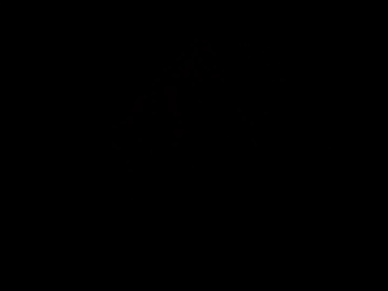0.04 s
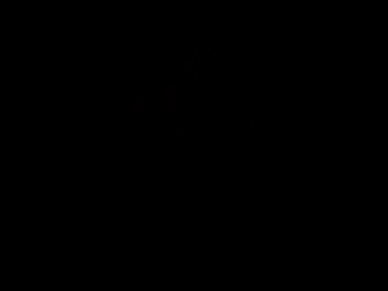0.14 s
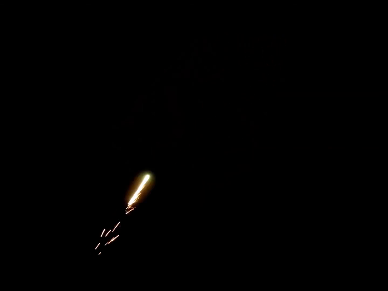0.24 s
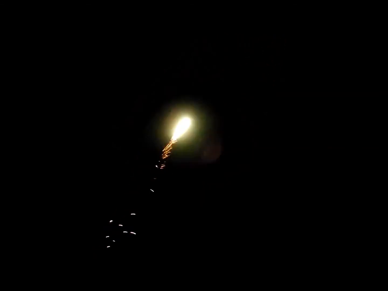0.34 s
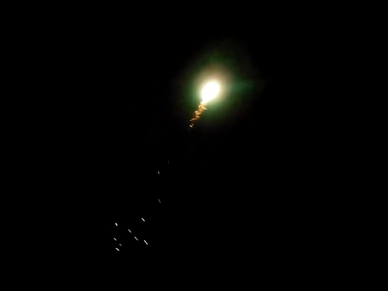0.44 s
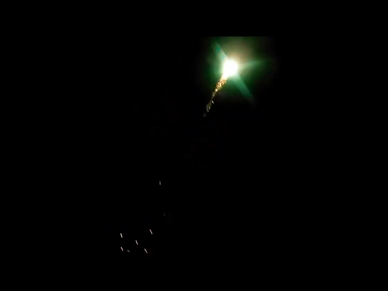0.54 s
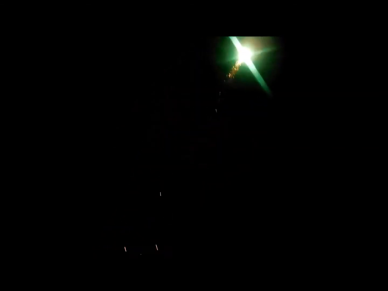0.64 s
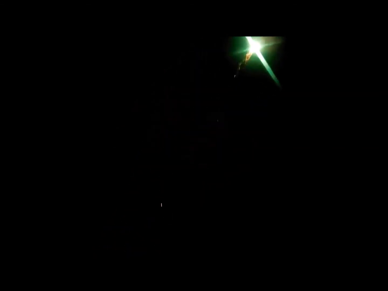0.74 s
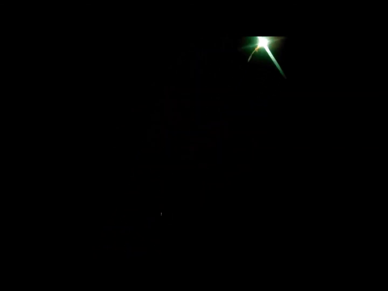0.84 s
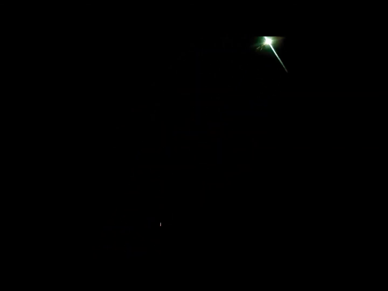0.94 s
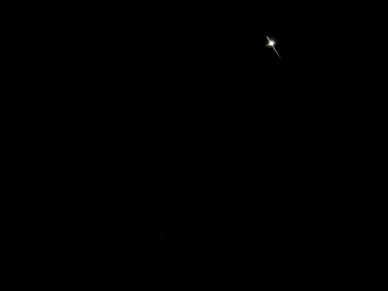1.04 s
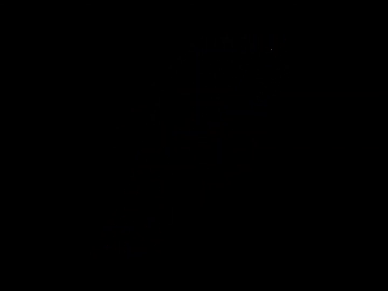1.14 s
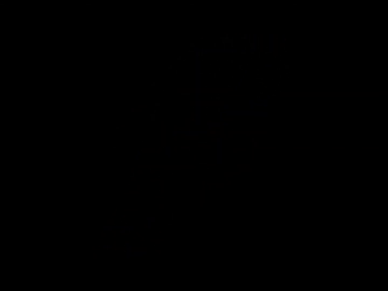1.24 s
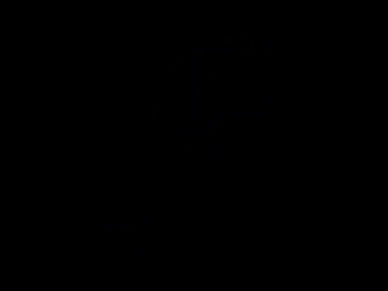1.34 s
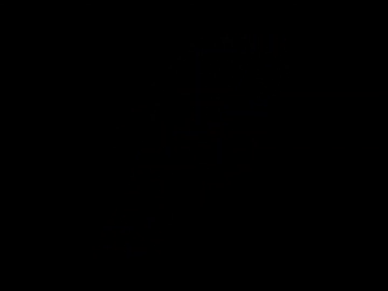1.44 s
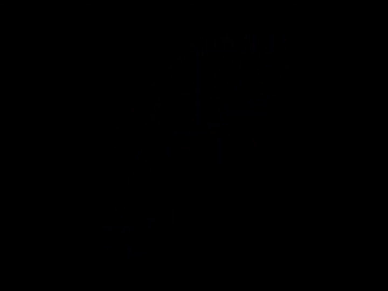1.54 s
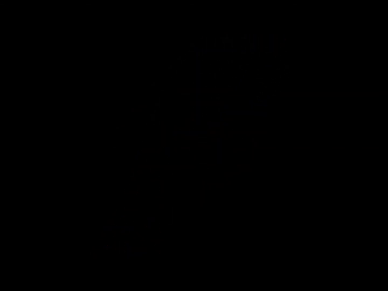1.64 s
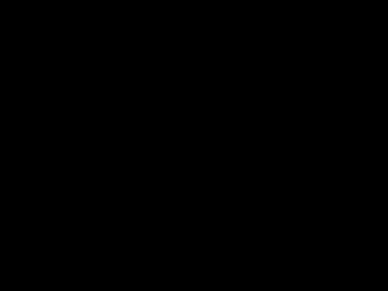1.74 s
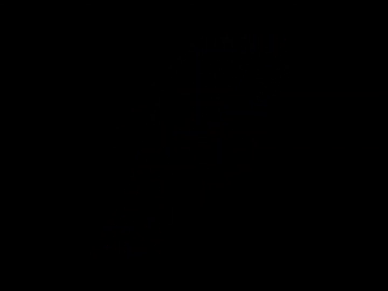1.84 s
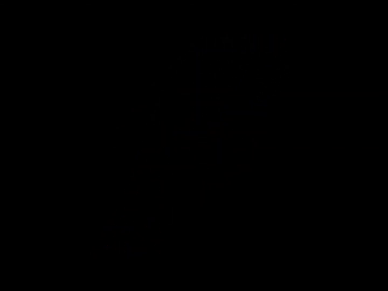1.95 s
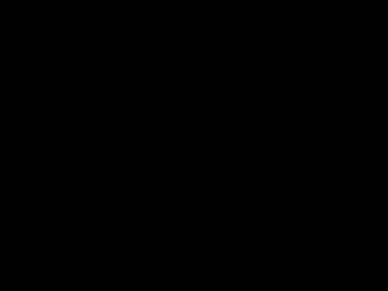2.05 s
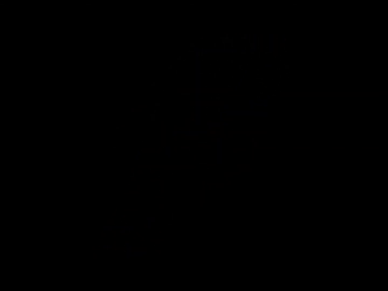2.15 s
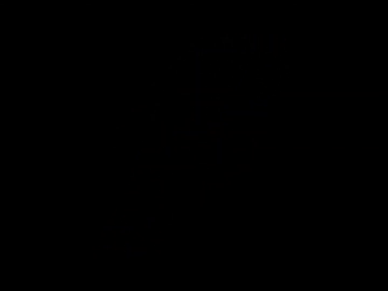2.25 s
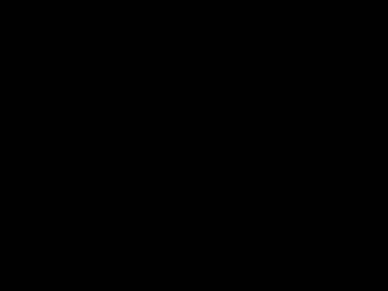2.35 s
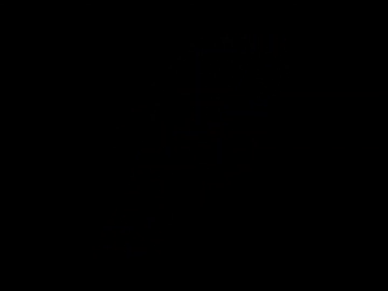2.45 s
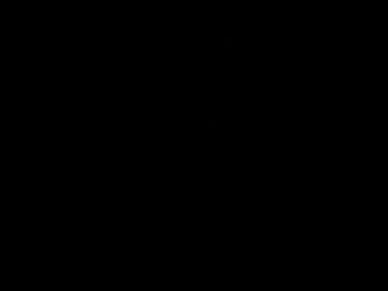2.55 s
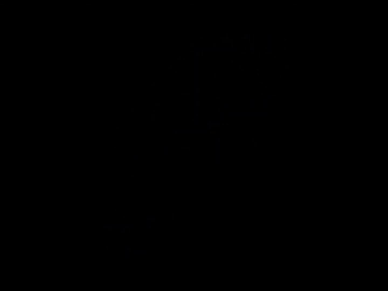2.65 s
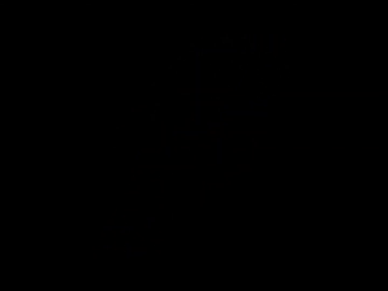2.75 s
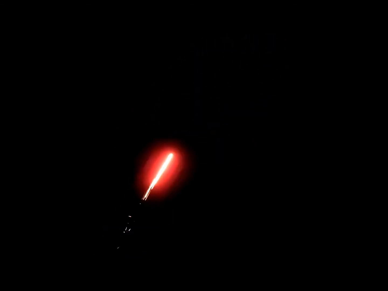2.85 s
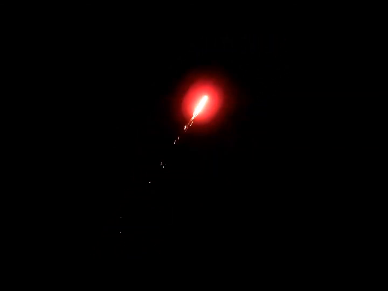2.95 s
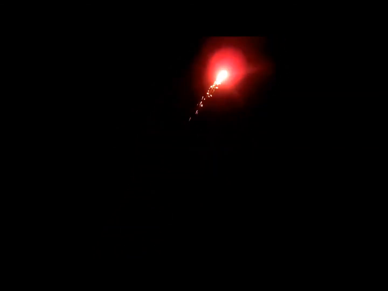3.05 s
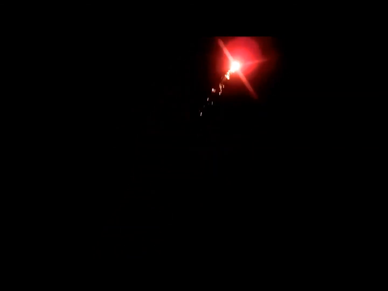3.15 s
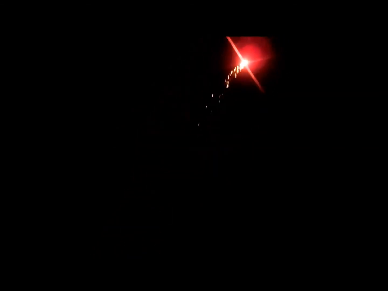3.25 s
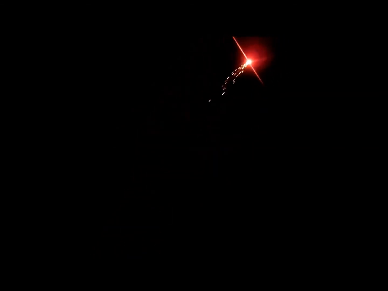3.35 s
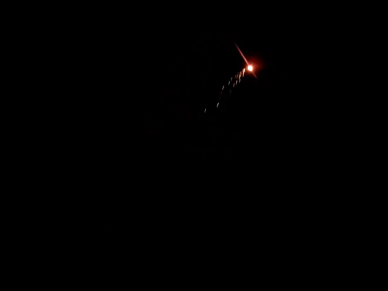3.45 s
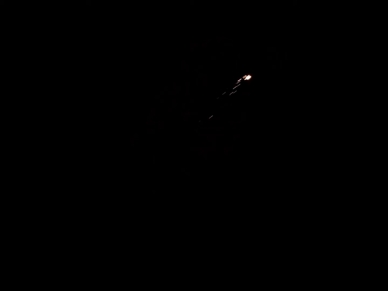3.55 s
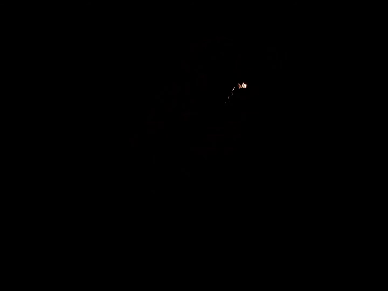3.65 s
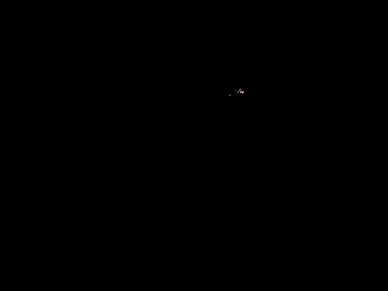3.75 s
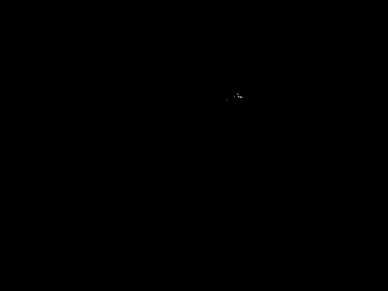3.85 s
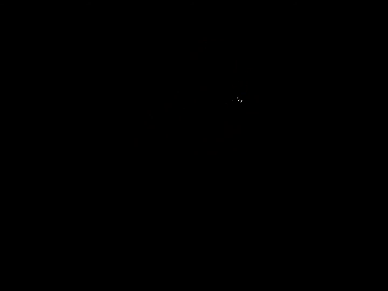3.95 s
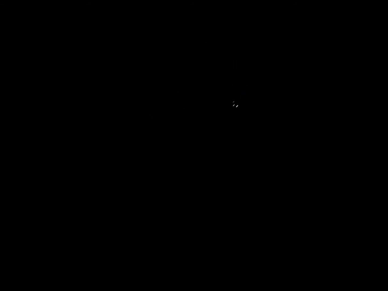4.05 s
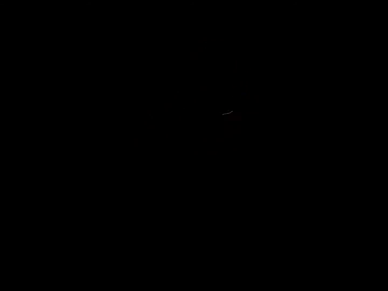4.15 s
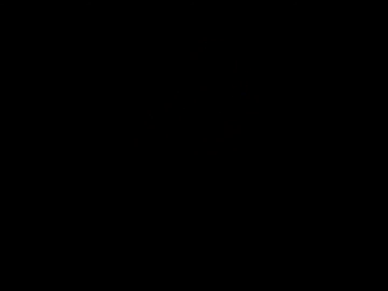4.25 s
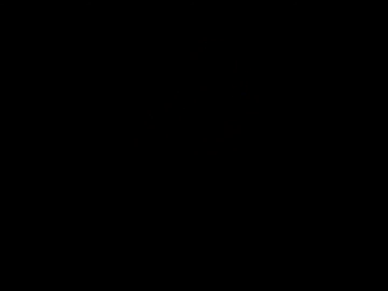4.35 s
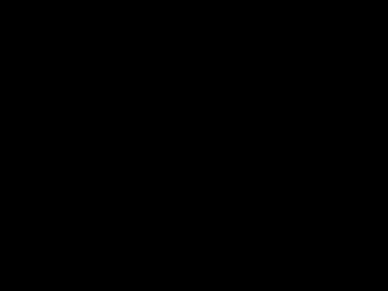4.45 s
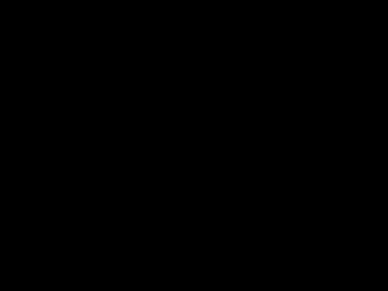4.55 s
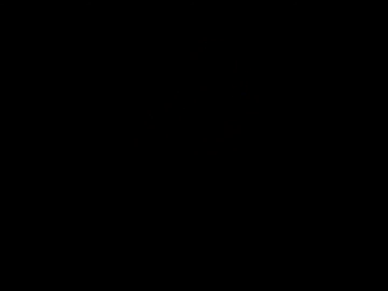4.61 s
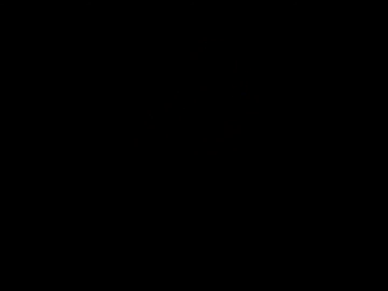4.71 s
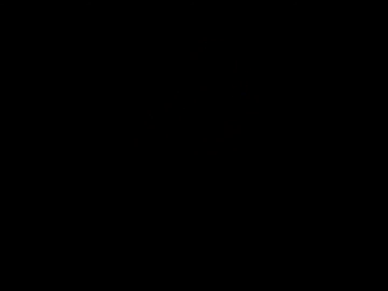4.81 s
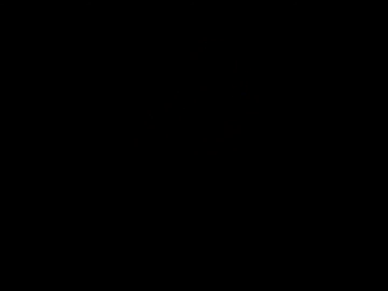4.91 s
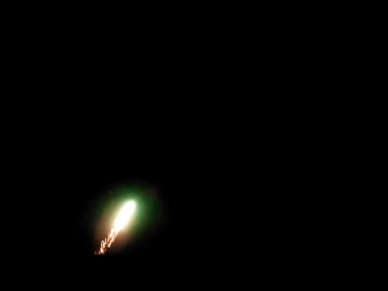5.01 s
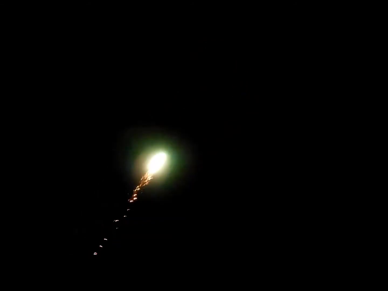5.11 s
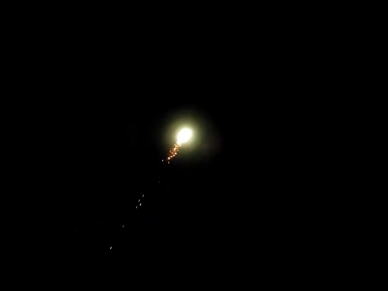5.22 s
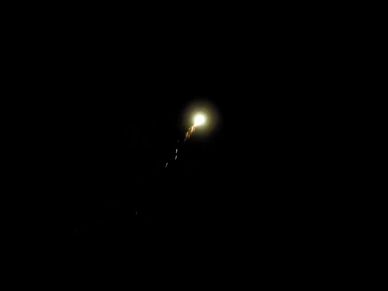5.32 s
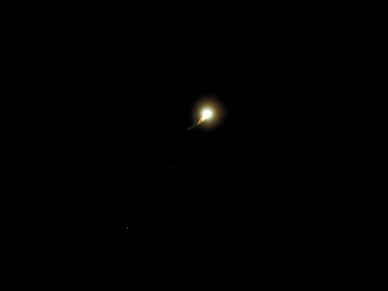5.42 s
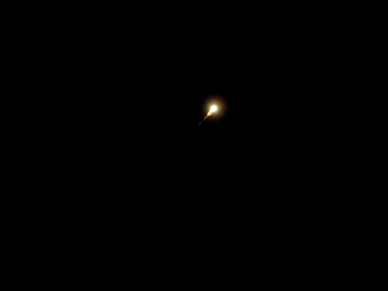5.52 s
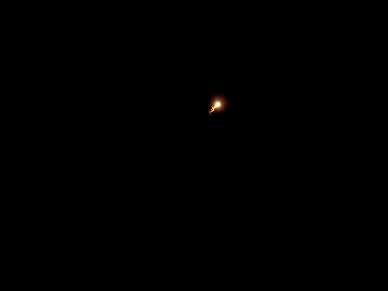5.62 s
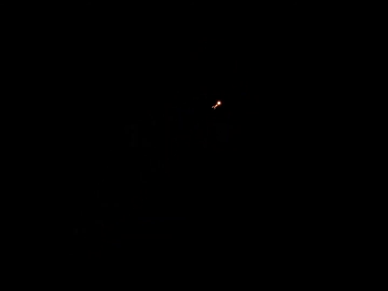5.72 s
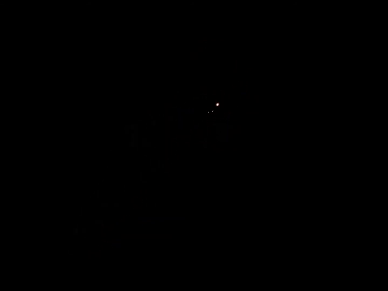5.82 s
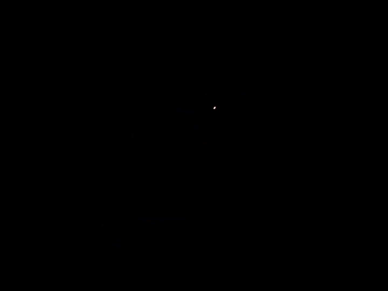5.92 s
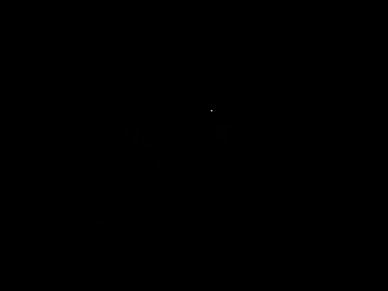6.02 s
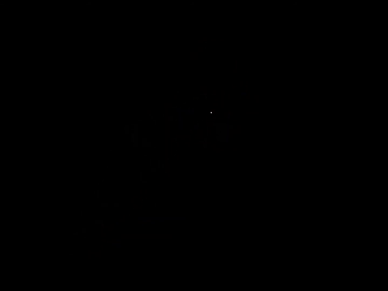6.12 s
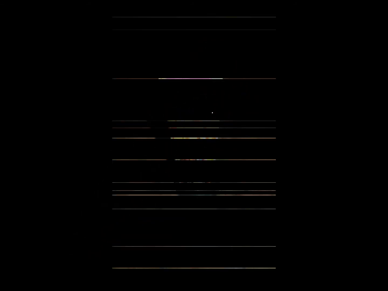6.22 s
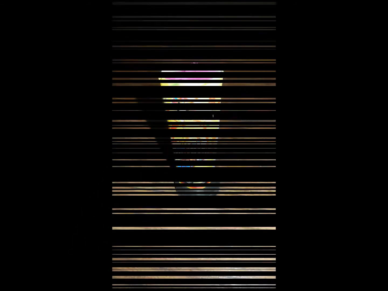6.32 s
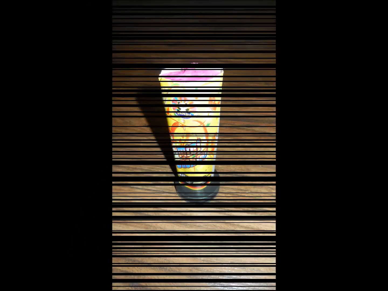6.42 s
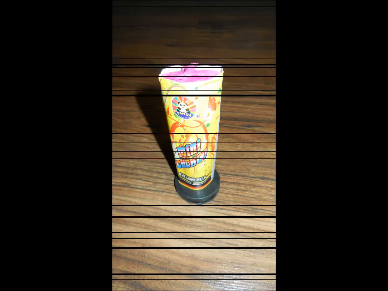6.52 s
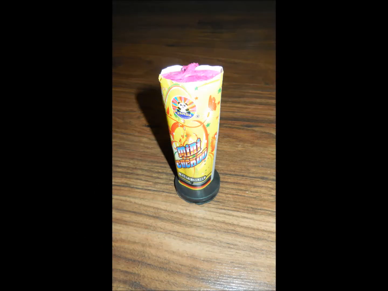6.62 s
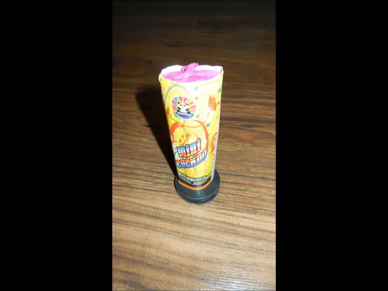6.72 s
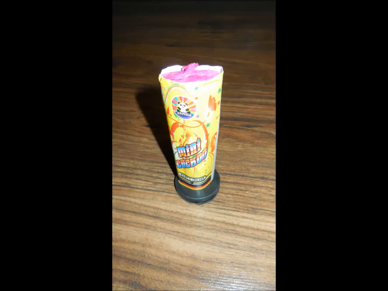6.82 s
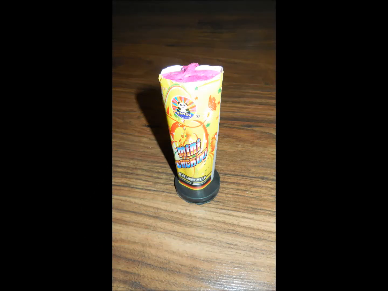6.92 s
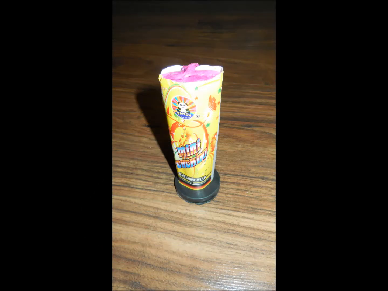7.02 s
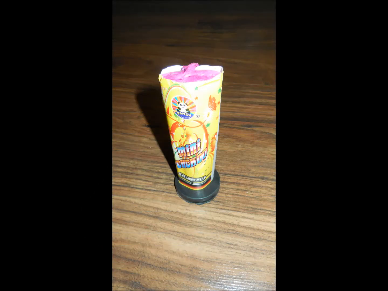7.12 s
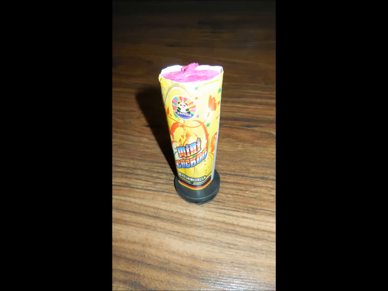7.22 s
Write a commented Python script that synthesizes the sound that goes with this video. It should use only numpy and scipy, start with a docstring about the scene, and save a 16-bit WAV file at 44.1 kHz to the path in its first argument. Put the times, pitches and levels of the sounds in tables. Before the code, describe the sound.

Outdoors at night, three sharp firework pops each trail a thin fading hiss, with a loud distant bang rolling away and wind buffeting the microphone.

```python
"""A Roman candle fires three stars outdoors at night: each a short blast of gas from the ringing tube,
then the hiss of the climbing star, as coloured noise under flow and burn envelopes.
The fuse sputters before the last shot. Far fireworks bang (filtered pulses) and roll around (echo noise).
Gusts buffet two microphone ports over a distant town hum, until the sound is switched off."""
import sys
import numpy as np
from scipy import signal
from scipy.fft import rfft, irfft
from scipy.io import wavfile

SR = 44100
rng = np.random.default_rng(int(sys.argv[2]) if len(sys.argv) > 2 else 0)


def digitize_waveform(pressure):
    """Quantize a signal to 16-bit integers and store it at the path in sys.argv[1].

    Rows of a 2-D input are taken as channels; values are limited to [-1, 1].
    """
    field = np.atleast_2d(pressure).T
    bounded = np.clip(field, -1, 1)
    quanta = np.round(bounded * 32767).astype(np.int16)
    wavfile.write(sys.argv[1], SR, quanta)


N = 320607
T = np.arange(N) / SR
HZ = np.fft.rfftfreq(N, 1 / SR)
EDGE_HZ = 15900  # upper band limit
NEAR_LAG_S, FAR_LAG_S = -0.00008, 0.000105  # left port's delay behind the right, in seconds: shots (negative, left ahead), far fireworks (left behind)


def gain_of(db):
    """Decibels to an amplitude factor."""
    return 10 ** (np.asarray(db) / 20)


def evened(x):
    """Scales to rms 1."""
    return x / np.sqrt(np.mean(x ** 2) + 1e-20)


def read(points, hz=HZ):
    """Joins (hz, value) points on a log frequency axis."""
    f, value = np.transpose(points)
    return np.interp(np.log(hz + 1), np.log(f + 1), value)


def level(s, db, fade_s):
    """A dB curve as a gain that fades out beyond its ends."""
    ends = np.interp(T, [s[0] - fade_s, s[0], s[-1], s[-1] + fade_s], [0, 1, 1, 0])
    return gain_of(np.interp(T, s, db)) * ends


def panned(left_minus_right_db):
    """Left and right gains of constant power."""
    pair = gain_of(np.array([[.5], [-.5]]) * left_minus_right_db)
    return pair / np.sqrt(np.mean(pair ** 2, axis=0))


def lift(hz, centre_hz, width_hz, db):
    """A resonance as a bump in dB."""
    return db / (1 + (2 * (hz - centre_hz) / width_hz) ** 2)


def noise(colour_db, same, drive=1):
    """Two channels of coloured noise, rms 1, of a given likeness; a sparse drive makes it grainy."""
    a, b = rfft(drive * rng.standard_normal((2, N)))
    same = np.clip(same, -1, 1)
    mid = a * np.sqrt(1 + same)
    side = b * np.sqrt(1 - same)
    spectra = np.array([mid + side, mid - side])
    return evened(irfft(spectra * gain_of(colour_db) * (HZ < EDGE_HZ), N))


def flutter(rate_hz, depth_db):
    """A random gain that wavers up to about a rate, with an rms depth."""
    slow = irfft(rfft(rng.standard_normal(N)) / (1 + (HZ / rate_hz) ** 4), N)
    return gain_of(depth_db * evened(slow))


def gate(start_s, end_s, edge_s):
    """Ramps up from the start, decays exponentially after the end."""
    return np.clip((T - start_s) / edge_s, 0, 1) * np.exp(-np.maximum(T - end_s, 0) / edge_s)


def swell(s, width_s):
    """A bell-shaped rise and fall around a moment."""
    return np.exp(-.5 * ((T - s) / width_s) ** 2)


def push(s, width_s):
    """A pressure pulse: a swell, then suction."""
    u = np.clip((T - s) / width_s, 0, 50)
    return 2 * u * (2 - u) * np.exp(-u)


def lagged(pair, lag_s):
    """Sound from one side reaches one port before the other."""
    turn = np.array([[-1j], [1j]]) * np.pi * HZ * lag_s
    return irfft(rfft(pair) * np.exp(turn), N)


def patchy(pair, width_hz, length_s, depth_db, size=512):
    """Bands swell and sink on their own, in patches of a given width and length."""
    hz, t, z = signal.stft(pair, SR, nperseg=size)
    across = np.fft.fftfreq(len(hz), hz[1])[:, None] * width_hz
    along = np.fft.rfftfreq(len(t), t[1]) * length_s
    blur = np.exp(-(2 * np.hypot(across, along)) ** 2)
    shape = z.shape[1:]
    field = np.fft.irfft2(np.fft.rfft2(rng.standard_normal(shape)) * blur, shape)
    gain = evened(gain_of(depth_db * np.clip(evened(field), -2, 2)))
    return signal.istft(z * gain, SR, nperseg=size)[1][:, :N]


# town hum and microphone hiss: hz, relative_db
NIGHT_COLOUR = [(15, -29.5), (25, 2.5), (49, -4), (70, -8), (211, -13), (235, -10), (261, -9.5), (371, -10),
                (500, -14), (587, -11), (1590, -19), (2030, -21), (2330, -23), (15800, -26.5)]
# port likeness for sound from all around, also for shots, yard and rush: hz, likeness_0_1
DIFFUSE_SAME = [(60, 0.9), (290, .93), (640, 0.7), (1400, .45), (3000, 0), (7000, 0), (15000, 0.9)]


def night(level_db=-46.5, treble_db=-2.0, pan_db=0.8):
    """Distant town hum and the steady hiss of the microphone, as one coloured noise."""
    colour_db = read(NIGHT_COLOUR) + treble_db * HZ / (HZ + 2000)
    return gain_of(level_db) * noise(colour_db, read(DIFFUSE_SAME)) * panned(pan_db)


# turbulence spectrum: hz, relative_db
WIND_COLOUR_DB = [(12, -1), (28, 3), (70, -0.5), (120, -6), (220, -13.5), (400, -28.5), (1000, -59.5),
                  (4000, -92)]
# light breeze between gusts: time_s, relative_db
BREEZE_LEVELS = [(1.95, -59), (2.3, -47.5), (3.449, -51), (3.8, -57), (4.2, -45.5), (5.9, -50.5),
                 (6.4, -43), (6.7, -44)]
# gusts on the ports: centre_s, relative_db, width_s, left_minus_right_db
GUST_SWELLS = [(2.13, -51, 0.04, 12), (2.359, -31.5, 0.026, -17), (2.435, -32.5, 0.025, -14),
               (2.52, -37, 0.039, -12), (2.78, -38, 0.032, -1), (2.86, -41, .025, -5),
               (2.99, -37, 0.013, 0), (3.195, -36.5, 0.012, 3), (3.35, -45, 0.025, 8),
               (4.07, -33, 0.037, 0.5), (4.172, -30.5, 0.023, -17), (4.235, -28, 0.028, -17),
               (4.335, -36.5, 0.021, -13), (4.42, -35.5, 0.032, -23), (4.86, -37.5, 0.03, 18),
               (4.96, -38.5, 0.028, 18), (5.18, -40, 0.054, 19), (5.49, -40, 0.036, -0.5),
               (5.62, -38, 0.045, 16), (5.825, -34.5, 0.014, -3), (5.87, -36, 0.012, 9),
               (6.05, -39.5, 0.027, -9.5), (6.18, -34.5, 0.064, 7), (6.365, -34.5, 0.027, -14),
               (6.5, -33.5, 0.035, 6), (6.6, -34.5, 0.034, -17), (6.675, -28.5, 0.025, -12.5)]
# single eddies that thump a port: centre_s, relative_db, width_s, left_minus_right_db
EDDIES = [(2.344, -24, 0.0047, -22), (2.372, -17, 0.0017, -24), (3.359, -20, 0.0025, 28),
          (4.164, -17, 0.0026, -20), (4.242, -17, 0.0045, -21), (4.342, -19.5, 0.0027, -18),
          (4.436, -17.5, 0.0044, -14), (6.117, -21.5, 0.0017, -14.5), (6.17, -14.5, 0.0016, -24),
          (6.493, -16.5, 0.0019, 21), (6.532, -15.5, 0.002, 23.5), (6.686, -23, 0.0017, -8)]


def wind(trim_db=1.0, lumpy_db=3.0, same=0.45):
    """Gusts over a light breeze: lumpy turbulence, mostly unrelated at the ports, with hard eddies."""
    power = level(*np.transpose(BREEZE_LEVELS), 0.38) ** 2
    for s, db, width_s, side_db in GUST_SWELLS:
        power = power + (gain_of(db) * swell(s, width_s) * panned(side_db)) ** 2
    lumps = np.array([flutter(25, lumpy_db), flutter(21, lumpy_db)])
    gusts = gain_of(trim_db) * np.sqrt(power) * noise(read(WIND_COLOUR_DB), same) * lumps
    for s, db, width_s, side_db in EDDIES:
        u = (T - s) / width_s
        thump = (1 - u ** 2) / (1 + u ** 2) ** 2
        gusts += gain_of(db) * panned(side_db) * thump / np.sqrt(2)
    return gusts


# bangs rolling back, a row per swell of echoes after a bang:
# start_s, relative_db, rise_s, linger_s, bright_share_0_1
ROLL_SWELLS = [(-.1, -44.5, 0.0496, .5, .15), (.085, -40.5, .005, 0.069, 0.1), (0.751, -30, 0.0073, 1.1, 1),
               (.972, -33, 0.04, 0.74, 0.42), (1.085, -31.5, 0.06, 0.46, 0), (1.86, -41.5, 0.03, 0.3, 0),
               (4.241, -30, 0.0024, 0.044, 0), (4.28, -41, 0.04, 0.35, 0), (5.801, -53.5, 0.071, 1.6, 0.1)]
# roll spectrum before the air's tilt: hz, relative_db
ROLL_COLOUR_DB = [(40, -23), (70, -11), (130, -21.5), (230, -5.5), (400, -2.5), (560, -3), (850, 0.5),
                  (1500, -5), (2200, -14), (3100, -19.5), (4000, -28), (7000, -43), (15000, -74)]
# port likeness for the far echoes: hz, likeness_0_1
FAR_LIKENESS = [(100, .93), (500, 0.99), (1000, 1), (2000, .55), (4000, .3), (15000, .3)]


def rolls(trim_db=.5, air_db_per_octave=6.5, dull_hz=1400, bright_decay_s=0.8, spread_power=2.316):
    """Countless echoes swell and thin out; later ones have come further and lost their treble."""
    tilt_db = air_db_per_octave * np.log2(1 + HZ / dull_hz)
    echoes_per_s, wash = 3200, .2  # separate echoes, smooth wash between them
    echoes = wash + (rng.random(N) < echoes_per_s / SR)
    bright = noise(read(ROLL_COLOUR_DB) + tilt_db, read(FAR_LIKENESS), echoes)
    dull = noise(read(ROLL_COLOUR_DB) - tilt_db, read(FAR_LIKENESS), echoes)
    near_power = far_power = 0
    for s, db, rise_s, linger_s, near in ROLL_SWELLS:
        age = np.maximum(T - s - rise_s, 0)
        rise = np.clip((T - s) / rise_s, 0, 1)
        power = (gain_of(db) * rise / (1 + age / linger_s) ** spread_power) ** 2
        share = np.clip(near, 0, 1) * np.exp(-age / bright_decay_s)
        near_power += share * power
        far_power += (1 - share) * power
    mix = np.sqrt(near_power) * bright + np.sqrt(far_power) * dull
    out = patchy(mix, width_hz=300, length_s=.03, depth_db=1.5)
    return lagged(gain_of(trim_db) * out * flutter(130, -0.04) * flutter(16, 0.82), FAR_LAG_S)


# walls that return the bangs: delay_s, relative_db
WALL_ECHOES = [(0.017, -10), (0.024, -7), (0.023, -22), (.0326, -8.5), (0.0417, -19)]


def walls(smear_s=0.0025, size=4096):
    """Each rough wall returns a short random smear of a bang."""
    t = np.arange(size) / SR
    smears = sum(gain_of(db) * (t >= delay_s) * np.exp(-abs(t - delay_s) / smear_s)
                 for delay_s, db in WALL_ECHOES)
    return smears * rng.standard_normal(size) * np.sqrt(2 / (smear_s * SR))


# far fireworks and the single late echoes of the big bang: front_s, front_db (before flattening),
# dulling_corner_hz, boom_hz, crack_hz, crack_lift_db, wall_echoes_db
FAR_BANGS = [(0.088, -32, 1300, 800, 1330, 15, 1), (0.7411, 7.5, 3000, 275, 1454, 18, -11.5),
             (0.864, -19, 2000, 480, 1400, 18, -4), (0.9976, -20, 617, 435, 894, 14, 2.5),
             (1.059, -22, 1300, 447, 1300, 11, -4), (1.124, -20, 1200, 597, 1000, 24, -8),
             (1.169, -24, 1100, 480, 910, 17, -4), (1.33, -26, 900, 600, 855, 15, -7),
             (3.158, -28.5, 556, 392, 1420, 32, -17.5), (3.414, -24.5, 760, 408.3, 1430, 30.5, -12),
             (4.0617, -26.5, 380, 290, 1280, -2, -12), (4.1326, -28, 736, 635, 1300, 20, -12),
             (4.2443, -19.5, 1110, 514, 816, 18, -3)]
# report spectrum before rings and dulling: hz, relative_db
REPORT_COLOUR = [(35, 2), (95, 14), (160, 7.5), (320, 8.5), (540, 10.5), (1020, -3), (3100, 9), (15500, 12)]


def bangs(boom_width_hz=230, boom_db=6, crack_width_hz=720, steep=3.54, ground_s=0.0043, ground_db=-12,
          size=4096):
    """Far fireworks and late echoes of the big bang, dulled by air, with ground bounce and wall echoes."""
    hz = abs(np.fft.fftfreq(size, 1 / SR))
    out = np.zeros(N)
    for s, db, corner_hz, boom_hz, crack_hz, crack_db, walls_db in FAR_BANGS:
        rings_db = lift(hz, boom_hz, boom_width_hz, boom_db) + lift(hz, crack_hz, crack_width_hz, crack_db)
        dulling = np.sqrt(1 + (hz / corner_hz) ** (steep * 2))
        colour = gain_of(read(REPORT_COLOUR, hz) + rings_db) / dulling
        # minimum phase: nothing sounds before the front
        report = np.fft.ifft(np.exp(signal.hilbert(np.log(colour + 1e-4)).conj())).real
        paths = gain_of(walls_db) * walls()
        paths[0] += 1
        paths[round(ground_s * SR)] += gain_of(ground_db)
        at = round(s * SR)
        out[at:at + size] -= gain_of(db) * signal.fftconvolve(report / abs(report).max(), paths)[:size]
    crest = .5  # the loudest front is flattened and gains a hard edge
    return lagged(np.clip(out, -crest, crest), FAR_LAG_S)


# flares before the last shot: centre_s, relative_db, width_s
FUSE_FLARES = [(4.317, -47.5, 0.014), (4.41, -51, 0.018), (4.5, -44.5, 0.014), (4.65, -51, 0.058),
               (4.757, -41.5, 0.021)]
# burning fuse spectrum: hz, relative_db
FUSE_COLOUR_DB = [(1760, -46), (3000, -12), (3620, -24), (4100, -9), (6490, -4), (7460, 2), (8870, -1.5),
                  (12000, 3.5), (13600, -0.5), (15800, -12.5)]
# spits: start_s, level_db, decay_s, left_minus_right_db, ring_hz, ring_lift_db
FUSE_SPITS = [(4.462, -35, .007, -2, 2900, 3), (4.9498, -30.5, .0045, -5, 1430, 32)]


def fuse(trim_db=1, pan_db=5, same=0.33, sputter_db=1.5, ring_width_hz=450):
    """The delay powder smoulders in the tube, flares up and spits twice."""
    burn = gain_of(-53.5) * gate(4.62, 5.01, .01)  # smoulder under the last two flares, up to the last shot
    burn = burn + sum(gain_of(db) * swell(s, width_s) for s, db, width_s in FUSE_FLARES)
    hiss = noise(read(FUSE_COLOUR_DB), same) * flutter(91, sputter_db)
    out = gain_of(trim_db) * burn * hiss * panned(pan_db)
    for s, db, decay_s, side_db, ring_hz, ring_db in FUSE_SPITS:
        puff = np.clip((T - s) / 0.00032, 0, 1) * np.exp(-np.maximum(T - s, 0) / decay_s)
        colour_db = read(BLAST_COLOUR) + lift(HZ, ring_hz, ring_width_hz, ring_db)
        out += gain_of(db) * puff * panned(side_db) * noise(colour_db, same)
    return out


# shot scatter spectrum: hz, relative_db
YARD_COLOUR = [(100, -0.5), (230, 1), (400, -8), (1000, -15), (1500, -6), (3000, 0), (5000, -2), (9000, -4),
               (16000, -18)]


def yard(rise_s=0.0082, hold_s=0.097, fall_s=0.024, waver_db=1.0):
    """Ground, fences and walls scatter each shot unevenly for about a tenth of a second."""
    spread = 0
    for s, *_, echo_db, _ in CANDLE_SHOTS:
        rise = np.clip((T - s) / rise_s, 0, 1)
        spread += gain_of(echo_db) * rise * np.exp(-np.maximum(T - s - hold_s, 0) / fall_s)
    scatter = patchy(noise(read(YARD_COLOUR), read(DIFFUSE_SAME)), width_hz=350, length_s=.05, depth_db=2.6)
    return spread * scatter * flutter(200, waver_db)


# burning stars: lit_s, full_burn_s, fizz_relative_db, fade_db_per_s, first_drop_s,
# level_after_drop_db (relative to the undropped fizz), fizz_end_s, rush_relative_db
BURNING_STARS = [(0.31, 0.55, -40, 11, 0.705, -8.5, 1.31, -51.5),
                 (2.925, 2.935, -35, 28, 2.85, -2, 3.6, -45), (5.05, 5.27, -40.5, 21, 7.8, 1, 5.95, -45)]
# fizz spectrum: hz, relative_db
FIZZ_COLOUR = [(1500, -27.5), (5000, -13.5), (7000, -13), (8000, -10.5), (9200, -11.5), (11000, -6),
               (12000, -4.5), (14000, -9), (16000, -19)]
# rush of air spectrum: hz, relative_db
RUSH_COLOUR = [(500, -25.5), (1500, -4), (3000, 2), (6000, -18.5), (8000, -2.5), (12000, -4.5),
               (16000, -25.5)]


def stars(fizz_trim_db=1.2, rush_trim_db=-2, same=0.5, sputter_db=0.84, waver_db=1.0):
    """Each fizzes ever fainter as it climbs, the first dropping suddenly, then goes out; bands waver."""
    kindle_db_per_s, edge_s = 26, .04
    rush_fade_db_per_s = 22  # the star slows and climbs away
    fizz = rush = 0
    for lit_s, full_s, db, fade_db_per_s, first_drop_s, after_db, fizz_end_s, rush_db in BURNING_STARS:
        burn_db = db - kindle_db_per_s * np.maximum(full_s - T, 0) - fade_db_per_s * np.maximum(T - full_s, 0)
        undropped = gate(lit_s, first_drop_s, edge_s)
        lasting = gate(lit_s, fizz_end_s, edge_s)
        fizz += gain_of(burn_db) * np.maximum(undropped, gain_of(after_db) * lasting)
        rush += gain_of(rush_db - rush_fade_db_per_s * np.maximum(T - lit_s, 0)) * lasting
    out = gain_of(fizz_trim_db) * fizz * noise(read(FIZZ_COLOUR), same)
    out = out + gain_of(rush_trim_db) * rush * noise(read(RUSH_COLOUR), read(DIFFUSE_SAME))
    out = patchy(out, width_hz=400, length_s=.04, depth_db=1.8)  # bands of the hiss waver unevenly
    return out * flutter(330, sputter_db) * flutter(22, waver_db)


# one row a star, also scattered by the yard:
# start_s, blast_relative_db, full_flow_s, fall_s, push_relative_db, yard_echo_db, venting_db
CANDLE_SHOTS = [(0.2658, -15.5, .0085, .0125, -18.5, -40, -41), (2.9002, -11, .008, .004, -11.5, -37, -34),
                (5.0238, -15, .0045, .012, -15.5, -42, -44)]
# tube and muzzle rings, changing as the charge burns down, one list a star: centre_hz, width_hz, lift_db
TUBE_RINGS = [
    [(810, 110, 13), (1398, 450, 8.5), (2600, 640, 7.5), (3450, 500, 4), (5295, 1100, 0)],
    [(470, 120, 11), (1534, 170, 12), (2440, 240, 12.5), (3447, 700, 8.5), (6100, 700, 3.5)],
    [(750, 110, 7), (925, 120, 10), (1250, 220, 6.5), (2100, 260, 7.5), (5400, 2710, 3.5)],
]
# gas leaving the muzzle, also the fuse spits: hz, relative_db
BLAST_COLOUR = [(40, -8), (220, 1), (400, -6), (1200, -5.5), (1900, -6), (4200, -3.5), (7000, -6),
                (9500, -1), (12000, 3), (14000, 0), (16000, -3)]


def shots(blast_trim_db=2.0, push_s=0.0012, least_same=0.64, vent_s=0.069):
    """Turbulent gas rushes from the ringing tube, a crack and low push in its rise; the rest vents softly."""
    rise_s, rough_db = .0021, 2
    crack_s, crack = .00015, 1.1
    same = np.maximum(read(DIFFUSE_SAME), least_same)
    out = np.zeros((2, N))
    for (s, db, hold_s, fall_s, push_db, _, vent_db), rings in zip(CANDLE_SHOTS, TUBE_RINGS):
        colour_db = read(BLAST_COLOUR) + sum(lift(HZ, *ring) for ring in rings)
        age = np.maximum(T - s - hold_s, 0)
        blast = gain_of(blast_trim_db + db) * np.exp(-age / fall_s)
        venting = gain_of(vent_db) * np.exp(-age / vent_s)
        gas = noise(colour_db, same) * flutter(1200, rough_db)
        out += np.clip((T - s) / rise_s, 0, 1) * np.hypot(blast, venting) * gas
        mid_rise_s = s + rise_s / 2
        out -= gain_of(push_db) * push(mid_rise_s, push_s) + crack * gain_of(db) * push(mid_rise_s, crack_s)
    # soft ground returns the bass
    ground_s, ground_share, ground_soft_hz = 0.0041, 0.57, 499
    ground = ground_share * np.exp(-2j * np.pi * HZ * ground_s) / (1 + (HZ / ground_soft_hz) ** 2)
    return lagged(irfft(rfft(out) * (1 + ground), N), NEAR_LAG_S)


def scene():
    """Night and wind, other fireworks far off, the candle close by."""
    return night() + wind() + rolls() + bangs() + fuse() + yard() + stars() + shots()


def record(dry):
    """Soft overload on the peaks, the switch-off, and the band limit."""
    ceiling, off_s = .74, 6.697
    sound = dry / (1 + (dry / ceiling) ** 4) ** (1 / 4) * (T < off_s)
    low_pass = signal.firwin(511, EDGE_HZ, window=("kaiser", 9), fs=SR)
    return signal.oaconvolve(sound, low_pass[None], "same", axes=1)


dry = scene()
out = record(dry)
digitize_waveform(out)
```